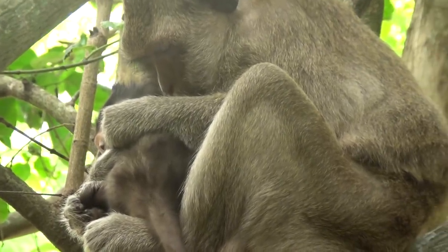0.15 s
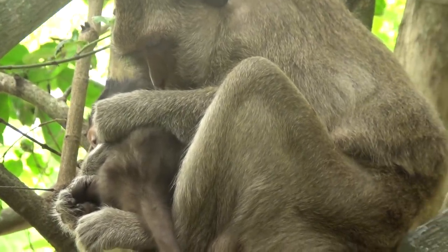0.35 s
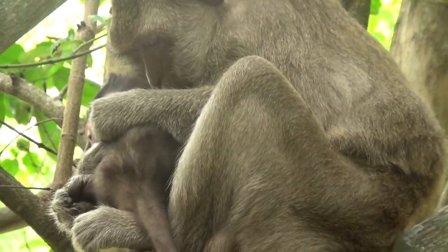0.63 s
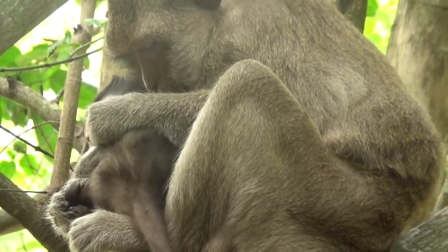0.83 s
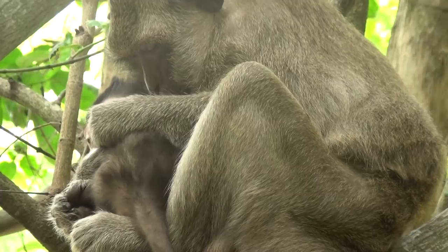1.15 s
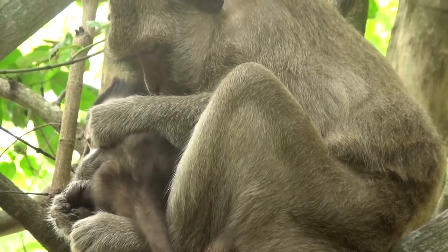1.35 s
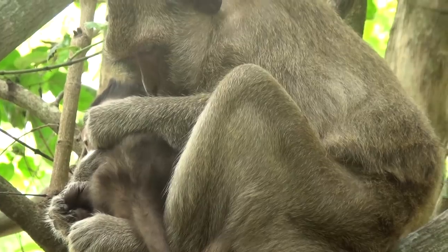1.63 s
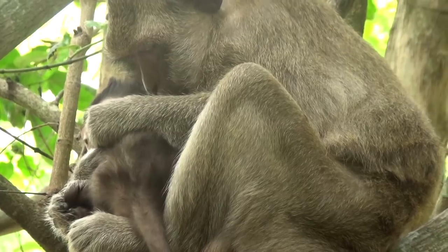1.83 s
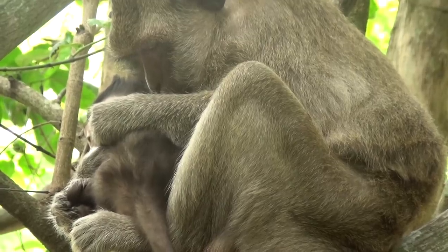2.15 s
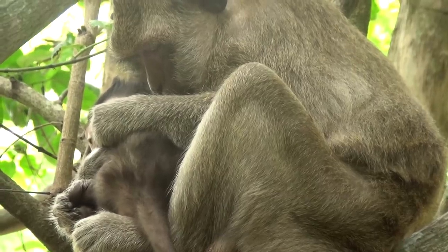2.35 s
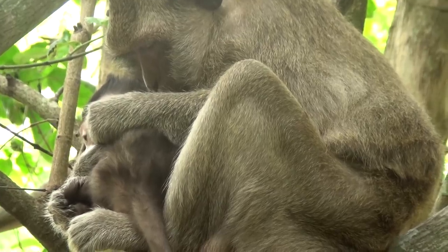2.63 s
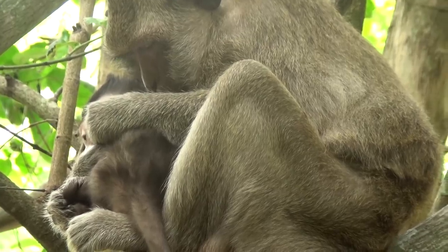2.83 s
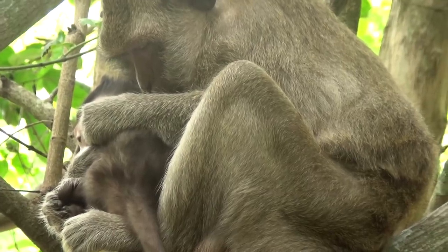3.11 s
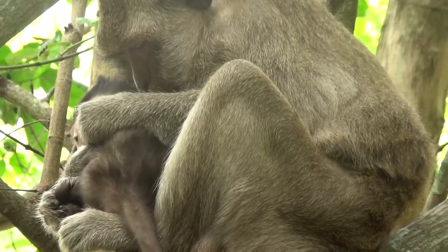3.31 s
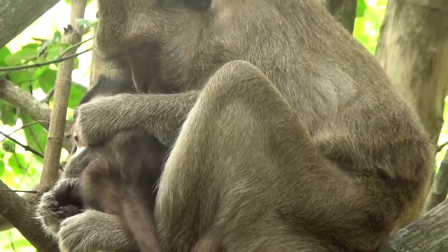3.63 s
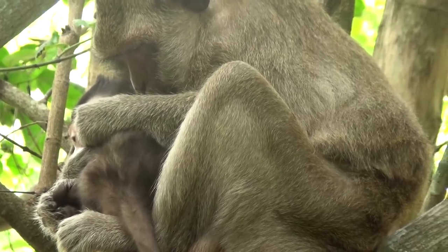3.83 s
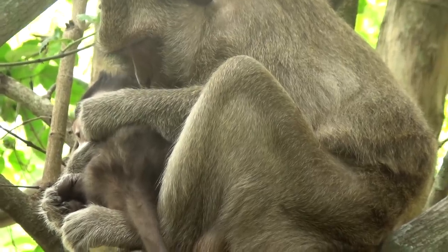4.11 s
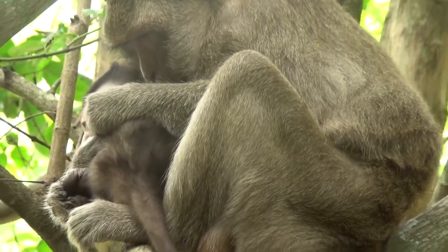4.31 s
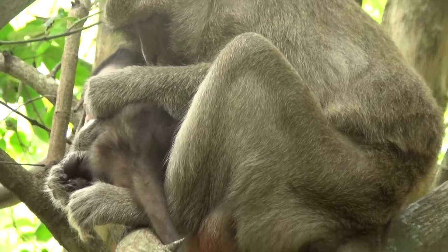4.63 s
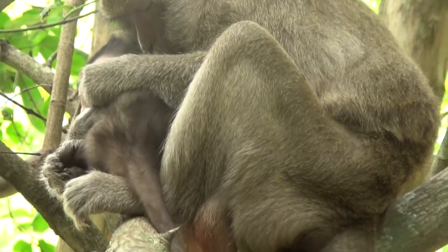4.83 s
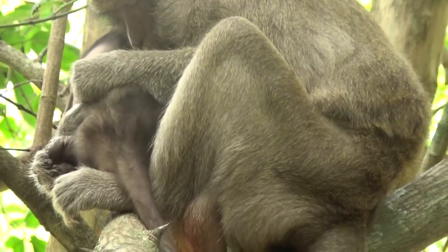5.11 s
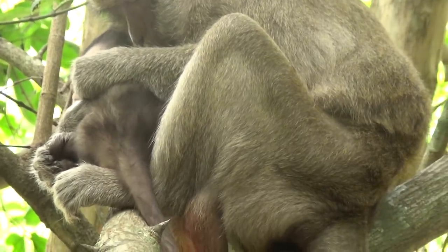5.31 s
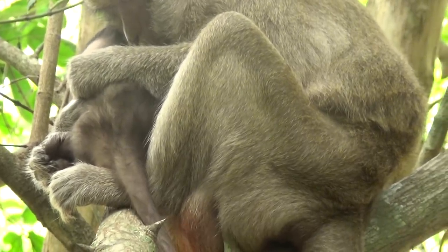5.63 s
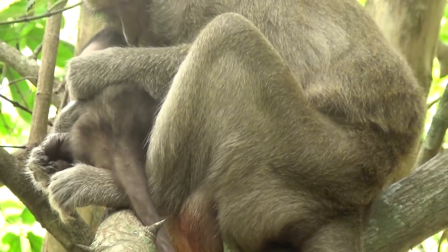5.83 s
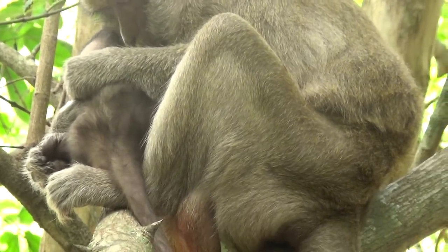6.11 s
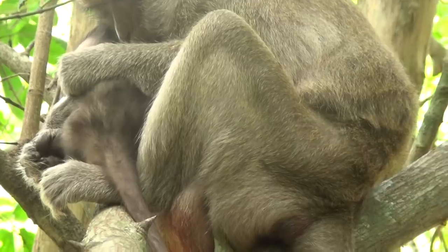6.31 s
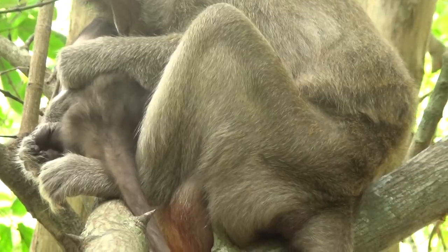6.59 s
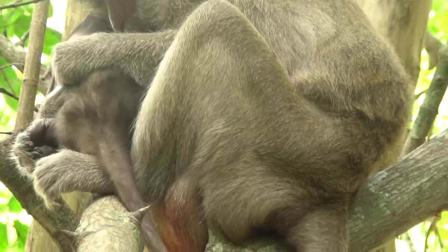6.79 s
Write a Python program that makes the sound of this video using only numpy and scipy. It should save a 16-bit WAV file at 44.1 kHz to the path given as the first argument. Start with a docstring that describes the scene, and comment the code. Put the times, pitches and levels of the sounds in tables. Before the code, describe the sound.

After a faint far whistle and a soft falling grunt with a scuff on bark, a monkey gives five clear, whistled coos that arch in pitch. Four short, very high squeals follow, each collapsing into a falling rasp. The calls come from nearly straight ahead, outdoors in a tree, with a brief echo from trunks and leaves. Foliage hisses softly over a distant low rumble.

```python
"""In a leafy tree, a monkey gives five arched, whistled coos, then four very high squeals.
Each squeal starts as a nearly pure whistle, splits into subharmonics under strain and collapses
into a falling rasp. A faint far call and a soft falling grunt with a scuff on bark come first.
Foliage hisses over a distant rumble, and trunks and leaves echo the calls."""
import sys
import numpy as np
from scipy import signal
from scipy.fft import rfft, irfft, next_fast_len
from scipy.io import wavfile
from scipy.ndimage import map_coordinates

SR = 44100
rng = np.random.default_rng(int(sys.argv[2]) if len(sys.argv) > 2 else 0)


def unload_audio(sound):
    """Save the sound as a 16-bit wav file, at the path given as the first command line argument."""
    columns = np.transpose(np.atleast_2d(sound))
    # keep every value between -1 and 1, then stretch to whole-number steps
    steps = np.round(np.clip(columns, -1, 1) * 32767)
    wavfile.write(sys.argv[1], SR, steps.astype(np.int16))


N = 306529
T = np.arange(N) / SR


def amp(db):
    """Decibels to gain."""
    return 10 ** (np.asarray(db) / 20)


def along(points, hz):
    """(f/Hz, value) points read on a log frequency axis."""
    f, v = np.transpose(points)
    return np.interp(np.log(hz + 1), np.log(f + 1), v)


def curves(rows, t):
    """One envelope for each column after the first, read at the times t."""
    times, *columns = np.transpose(rows)
    return [np.interp(t, times, column) for column in columns]


def ramp(t, start, end):
    """From 0 at start to 1 at end."""
    return np.clip((t - start) / (end - start), 0, 1)


def bumps(rows, t):
    """Sum of bell curves: t/s, width/s, height."""
    return sum(height * np.exp(-((t - s) / width) ** 2) for s, width, height in rows)


def stretch(start, end, edge):
    """Sample indices, times and gate of one sound, with fades edge seconds long."""
    i = np.arange(int((start - edge) * SR), int((end + edge) * SR))
    t = T[i]
    fade = np.clip(np.minimum(t - start, end - t) / edge + .5, 0, 1)
    return i, t, np.sin(np.pi / 2 * fade) ** 2


def wobble(rate, t):
    """A smooth random modulator, rate knots a second."""
    return map_coordinates(rng.standard_normal(len(t) // 2), [(t - t[0]) * rate], mode="wrap")


def cycle(hz):
    """Running phase of a pitch curve."""
    return 2 * np.pi * np.cumsum(hz) / SR


def filtered(x, response):
    """Zero-phase EQ; response gives the gain at each frequency."""
    size = next_fast_len(x.shape[-1] + 8192)
    return irfft(rfft(x, size) * response(np.fft.rfftfreq(size, 1 / SR)), size)[..., :x.shape[-1]]


def noise(colour, t):
    """Coloured noise of rms 1."""
    x = filtered(rng.standard_normal(len(t)), lambda hz: amp(along(colour, hz)))
    return x / np.sqrt(np.mean(x ** 2) + 1e-20)


def stereo_noise(colour):
    """A noise bed, mostly alike in both ears."""
    # left-right likeness: f/Hz, correlation
    likeness = [(40, 1), (150, 0.95), (600, 0.84), (2200, 0.93), (8000, 0.81), (13000, 1)]
    angle = lambda hz: np.arccos(np.clip(along(likeness, hz), -1, 1)) / 2
    mid = filtered(noise(colour, T), lambda hz: np.cos(angle(hz)))
    side = filtered(noise(colour, T), lambda hz: np.sin(angle(hz)))
    return np.array([mid + side, mid - side])


def foliage(rustle_db=0.54, brush_at_s=1.42, brush_width_s=0.017, brush_db=-55):
    """Leaf hiss that comes and goes, with one quick brush against the leaves."""
    # swells of the hiss: t/s, level/dB
    hiss_envelope = [(0, -72.5), (1.7, -72), (2.4, -72), (3.05, -66), (3.2, -70), (3.5, -63), (4.22, -58),
                     (4.35, -63.5), (4.78, -69), (4.93, -58.5), (5.03, -57.5), (5.15, -65), (5.55, -63.5),
                     (6, -67.5), (6.6, -66), (6.95, -71)]
    # colour of the leaves: f/Hz, level/dB
    leaf_colour = [(1180, -18), (2000, -5), (2600, -5), (2960, -5.5), (3230, -3.5), (3680, -3.5),
                   (8120, 0.5), (12500, -3), (16000, -10)]
    swells = amp(curves(hiss_envelope, T)[0] + rustle_db * wobble(30, T))
    brush = bumps([(brush_at_s, brush_width_s, amp(brush_db))], T)
    return (swells + brush) * stereo_noise(leaf_colour)


def distant_rumble(level_db=-57.0, sway_db=0.66):
    """A low, gently wavering bed from far away."""
    # colour of the rumble: f/Hz, level/dB
    rumble_colour = [(10, -31), (22, -13.5), (40, 1.5), (65, -4.5), (100, 0.5), (180, -10), (210, -7.5),
                     (390, -14), (560, -11.5), (690, -17.5), (1100, -16.5), (1550, -18.5), (2000, -26.5),
                     (4000, -31.5), (8000, -43.5)]
    return amp(level_db + sway_db * wobble(8, T)) * stereo_noise(rumble_colour)


def far_call(quaver=.01):
    """A thin falling whistle deep in the trees."""
    # the whistle's glide: t/s, f/Hz, level/dB
    contour = [(.06, 2960, -70), (.12, 2940, -79), (.16, 2660, -68), (.22, 2500, -72)]
    out = np.zeros(N)
    i, t, gate = stretch(contour[0][0], contour[-1][0], edge=0.025)
    pitch, db = curves(contour, t)
    phase = cycle(pitch * (1 + quaver * wobble(98, t)))
    out[i] = gate * amp(db) * np.sqrt(2) * np.sin(phase)
    return out


def grunt(jitter=0.033, octave_db=-11):
    """A short low grunt that drops two octaves."""
    # the voice's drop: t/s, f/Hz, relative level/dB
    contour = [(0.247, 565, -64), (.265, 418, -52.5), (.29, 269.5, -47.5), (.302, 154, -38.5),
               (.315, 133, -43), (.345, 125, -57)]
    out = np.zeros(N)
    i, t, gate = stretch(contour[0][0], contour[-1][0], edge=.01)
    pitch, db = curves(contour, t)
    phase = cycle(pitch * (1 + jitter * wobble(185, t)))
    out[i] = gate * amp(db) * np.sqrt(2) * (np.sin(phase) + amp(octave_db) * np.sin(2 * phase))
    return out


def scuff():
    """A dull scrape on the branch, under the grunt."""
    # rise and fall of the scrape: t/s, level/dB
    scuff_envelope = [(.2, -64), (.26, -61.5), (.3, -52.5), (.35, -54.5), (.43, -57.5), (0.561, -65)]
    # colour of the bark: f/Hz, level/dB
    bark_colour = [(120, -26), (230, 0.5), (420, -0.5), (600, -9.5), (1000, -10.5), (2100, -16),
                   (2800, -10.5), (4700, -18), (5800, -29), (10000, -34), (12500, -26), (16000, -39)]
    out = np.zeros(N)
    i, t, gate = stretch(scuff_envelope[0][0], scuff_envelope[-1][0], edge=0.032)
    out[i] = gate * amp(curves(scuff_envelope, t)[0]) * noise(bark_colour, t)
    return out


def coos(usual_hz=1538, tremor=0.0041, shimmer_db=2.5, sag_db=4.5, spill_db=-31, air_db=-18,
         edge_growth=2.77, edge_db_per_octave=21):
    """A nearly pure voice that swells and sags: two strong partials, and a bright edge when pushed."""
    # one pitch arch per coo: t/s, f/Hz
    arches = [
        [(0.56, 1230), (0.584, 1356), (0.619, 1445), (0.74, 1747), (0.846, 1871), (0.931, 1890), (0.99, 1831),
         (1.038, 1710), (1.088, 1360)],
        [(1.25, 1106), (1.297, 1348), (1.356, 1450), (1.486, 1575), (1.551, 1525), (1.61, 1431)],
        [(1.81, 1213), (1.878, 1552), (1.895, 1507), (1.916, 1570), (1.975, 1527), (2.064, 1565), (2.102, 1618),
         (2.24, 1434)],
        [(2.5, 1437), (2.527, 1487), (2.553, 1417), (2.565, 1500), (2.58, 1546), (2.686, 1492), (2.698, 1464),
         (2.939, 1496), (3.087, 1371)],
        [(3.44, 1322), (3.531, 1332), (3.567, 1485), (3.579, 1432), (3.611, 1522), (3.635, 1439), (3.717, 1433),
         (3.776, 1491), (3.95, 1390)],
    ]
    # each coo's effort: peak t/s, level/dB, swell to the peak/dB, bright edge/dB
    efforts = [(.985, -44, 7.5, -54), (1.5, -46.5, 1, -64), (2.16, -46.8, 4, -64), (2.95, -49, 9.5, -63.5),
               (3.82, -49.5, 9, -64)]
    # the voice flips briefly upward: t/s, width/s, rise/share of pitch
    flips = [(1.881, .01, 0.092), (1.921, .009, 0.14), (2.115, 0.0066, 0.047), (2.868, .015, .02)]
    # the voice turns hoarse: t/s, width/s, roughness/0-1
    hoarse_spots = [(1.06, 0.023, 0.47), (1.59, 0.026, 0.33), (1.9, 0.062, 0.52), (2.11, 0.028, .4),
                    (2.23, 0.015, 0.35), (2.62, 0.1, 0.48), (2.9, .08, 0.17), (3.06, 0.043, 0.2),
                    (3.56, 0.07, 0.57), (3.92, 0.033, 0.23)]
    # the voice falters: t/s, width/s, dip/dB
    falters = [(1.88, 0.054, -5.5), (2.54, 0.026, -9.5), (2.685, .014, -4), (2.835, 0.011, -7),
               (3.48, 0.031, -7)]
    # peaks and dips that the fundamental slides through: f/Hz, level/dB
    fundamental_colour = [(1130, 1), (1270, 4), (1340, 3.5), (1420, 1), (1465, 2.5), (1500, -2),
                          (1548, 6.5), (1585, 0.5), (1612, 1.5), (1660, -4), (1715, 1), (1790, -11),
                          (1865, -3), (1895, -13)]
    # colour of the octave: f/Hz, level/dB
    octave_colour = [(2400, -11), (2760, -4), (2950, -8), (3010, 0), (3090, -0.5), (3480, 4), (3700, -1.5),
                     (3780, -9)]
    # colour of the upper harmonics and breath: f/Hz, level/dB
    throat_colour = [(3700, 5), (4500, -5), (5600, -14), (6200, -11.5), (7600, -14.5), (9000, -0.5),
                     (10500, -5.5), (11400, 1.5), (12300, 1), (13200, -15), (15000, -22), (17000, -33)]
    out = np.zeros(N)
    for arch, (peak, level_db, swell_db, edge_db) in zip(arches, efforts):
        start, end = arch[0][0], arch[-1][0]
        i, t, gate = stretch(start, end, edge=.008)
        pitch, = curves(arch, t)
        flip, rough = bumps(flips, t), bumps(hoarse_spots, t)
        effort_db = -swell_db * (1 - ramp(t, start, peak)) ** 2 - sag_db * ramp(t, peak, end) ** 2
        # the edge grows faster than the effort, and with pitch
        bright_db = edge_db + edge_growth * effort_db + edge_db_per_octave * np.log2(pitch / usual_hz)
        pitch = pitch * (1 + flip + tremor * wobble(70.2, t))
        db = level_db + effort_db + bumps(falters, t)
        fundamental_db = db + along(fundamental_colour, pitch)
        octave_db = db + along(octave_colour, 2 * pitch) + 32 * flip  # flips push the octave forward
        # hoarseness shakes the pitch, adds breath and makes the level flutter
        pitch = pitch * (1 + 0.023 * rough * wobble(500, t))
        phase = cycle(pitch)
        gains = [amp(fundamental_db), amp(octave_db)]
        gains += [amp(bright_db + along(throat_colour, k * pitch)) for k in range(3, 11)]
        gains[2] += amp(octave_db + spill_db)  # a little octave spills into the third harmonic
        voice = sum(gain * amp(shimmer_db * wobble(59.68, t)) * np.sin(k * phase)
                    for k, gain in enumerate(gains, 1))
        breath = amp(bright_db + air_db + 16 * rough) * noise([(2000, -44)] + throat_colour, t)
        flutter = amp(3.0 * rough * wobble(250.8, t))
        out[i] += gate * flutter * (np.sqrt(2) * voice + breath)
    return out


def squeals(tremor=0.006, jitter=0.0048, shimmer_db=2.5, db_per_octave=20, doubling_s=0.017,
            twin_ratio=0.96, twin_db=-15, twin_swing_db=6, twin_slip_rad=0.29, split_slip_rad=0.35,
            halves_trace_db=-33, thirds_trace_db=-37, air_db=-20.0):
    """A whistle near 9 kHz; under strain it repeats only every second, then every third cycle."""
    # one pitch curve per squeal: t/s, f/Hz
    contours = [
        [(4.319, 8840), (4.335, 8900), (4.341, 9400), (4.385, 10150), (4.429, 9980), (4.447, 9639),
         (4.49, 9700)],
        [(5.068, 8420), (5.088, 9190), (5.104, 9020), (5.11, 8610), (5.122, 8500), (5.194, 9460), (5.21, 8540),
         (5.229, 8630)],
        [(5.612, 8630), (5.636, 9300), (5.662, 8150), (5.682, 8756), (5.706, 8030), (5.732, 9160),
         (5.764, 8040), (5.78, 7900)],
        [(6.132, 8370), (6.15, 8800), (6.154, 9150), (6.164, 9611), (6.198, 9470), (6.21, 9080), (6.304, 9080),
         (6.317, 7930)],
    ]
    # each squeal's strain: relative level/dB, opening accent/dB, period doubled t/s, halves/dB,
    # period tripled t/s, tripling time/s, thirds/dB
    strains = [(-37, -2, 4.458, -8, 4.487, 0.087, -8), (-38, 1, 5.17, -22, 5.215, 0.065, -1.5),
               (-37.5, -2, 5.675, -12.5, 5.762, .03, -4.5), (-38, 4.5, 6.226, -9, 6.31, 0.053, 2)]
    # colour of the subharmonics: f/Hz, level/dB
    split_colour = [(2800, -21), (4500, -4), (5700, -4), (11500, 3.5), (14000, 4), (16500, 8)]
    # throat noise around the whistle: f/Hz, level/dB
    air_colour = [(2000, -41), (3200, -19), (6000, -2), (7800, -3), (9500, -21), (10700, -18), (12000, 14),
                  (13200, -11), (14600, -7), (16500, -7)]
    out = np.zeros(N)
    for contour, strain in zip(contours, strains):
        level_db, accent_db, doubled_at, halves_db, tripled_at, tripling_s, thirds_db = strain
        i, t, gate = stretch(contour[0][0], contour[-1][0], edge=.003)
        pitch, = curves(contour, t)
        push_db = bumps([(t[0] + 0.025, 0.026, accent_db)], t)  # just after the attack
        db = level_db + db_per_octave * np.log2(pitch / pitch.mean()) + push_db
        halves_gain = amp(np.interp(t, [doubled_at - doubling_s, doubled_at],
                                    [halves_trace_db, halves_db]))
        thirds_gain = amp(np.interp(t, [tripled_at - tripling_s, tripled_at],
                                    [thirds_trace_db, thirds_db]))
        pitch = pitch * (1 + tremor * wobble(251, t) + jitter * wobble(1400, t))
        phase = cycle(pitch)

        def partial(ratio):
            """One unsteady tone of the split voice, at ratio times the pitch."""
            gain = amp(along(split_colour, ratio * pitch) + shimmer_db * wobble(198, t))
            return gain * np.sin(ratio * (phase + split_slip_rad * wobble(1200, t)))

        halves = partial(1 / 2) + partial(3 / 2)
        thirds = sum(partial(k / 3) for k in (1, 2, 4, 5))
        # the other vocal fold runs slightly flat and beats against the first
        twin_gain = amp(twin_db + twin_swing_db * np.tanh(wobble(30.6, t)))
        twin = twin_gain * np.sin(twin_ratio * phase + twin_slip_rad * wobble(377, t))
        voice = np.sin(phase) + twin + halves_gain * halves + thirds_gain * thirds
        # turbulence in the throat grows through the squeal
        air = amp(air_db) * np.linspace(.3, 1.5, len(t)) * noise(air_colour, t)
        out[i] += gate * amp(db + shimmer_db * wobble(148.7, t)) * (np.sqrt(2) * voice + air)
    return out


def rasps(jitter=0.0502, ragged_rate=650, octave_db=-8, core_colour_depth=0.37, crossover_hz=5200,
          treble_fade_db=-11, low_db=-2, low_lag_db=-9.0, onset_db=-14, release_db=-4, flutter_db=3.0):
    """The voice turns chaotic: a fluttering noise that darkens around a ragged core sliding down."""
    # the collapse that ends each squeal: start t/s, full t/s, end t/s, relative noise level/dB,
    # relative core level/dB, core's first f/Hz, core's last f/Hz
    collapses = [(4.478, 4.498, 4.544, -27.5, -28, 6890, 3850), (5.194, 5.242, 5.281, -29, -35, 5960, 2690),
                 (5.756, 5.793, 5.817, -32, -35.5, 5460, 3310),
                 (6.304, 6.325, 6.351, -29.5, -31, 5620, 3533)]
    # colour of the rasp: f/Hz, level/dB
    rasp_colour = [(1700, -30), (2400, -13.5), (3300, -4), (4200, -0.5), (5800, 2), (7500, -0.5),
                   (10000, 1), (12000, -5.5), (14200, -1.5), (16500, -10)]

    def ragged(phase, t):
        """A tone smeared into a narrow band of noise."""
        return wobble(ragged_rate, t) * np.sin(phase) + wobble(ragged_rate, t) * np.cos(phase)

    out = np.zeros(N)
    for start, full, end, noise_db, core_db, first_hz, last_hz in collapses:
        i, t, gate = stretch(start, end, edge=.008)
        rise, fall = ramp(t, start, full), ramp(t, full, end)
        slide = np.sin(np.pi / 2 * fall) ** 2
        pitch = first_hz + (last_hz - first_hz) * slide
        phase = cycle(pitch * (1 + jitter * wobble(1500, t)))
        core_gain = amp(core_db + core_colour_depth * along(rasp_colour, pitch)) * rise
        core = core_gain * (ragged(phase, t) + amp(octave_db) * ragged(2 * phase, t))
        chaos = noise(rasp_colour, t)
        low = filtered(chaos, lambda hz: 1 / (1 + (hz / crossover_hz) ** 8))
        treble = chaos - low
        # as the throat relaxes the treble fades and the lower band comes in
        darkening = amp(treble_fade_db * fall) * treble + amp(low_db + low_lag_db * (1 - slide)) * low
        db = onset_db * (1 - rise) + release_db * fall ** 4 + flutter_db * wobble(597, t)
        out[i] += gate * amp(db) * (core + amp(noise_db) * darkening)
    return out


def canopy(x, trunks_db, leaves_db, trunks_t60_s=0.095, echoes_per_s=900, side_db=-10):
    """Near trunks throw back quick echoes; the leaves scatter a soft tail."""
    # decay among the leaves: f/Hz, t60/s
    leaf_decay = [(200, 0.34), (1500, 0.28), (4000, .36), (9000, 0.39), (16000, 0.3)]
    # stereo width of the echoes: f/Hz, relative side level/dB
    echo_width = [(1500, -1), (2500, -9.5), (5000, -2.5), (10000, 0), (12500, -11.5)]
    hz, t, spectra = signal.stft(rng.standard_normal((2, SR // 2)), SR, nperseg=256)
    tail = signal.istft(spectra * amp(-60 * t / along(leaf_decay, hz)[:, None]), SR, nperseg=256)[1]
    lag = np.arange(tail.shape[1]) / SR
    taps = rng.standard_normal(tail.shape) * (rng.random(tail.shape) < echoes_per_s / SR)
    trunks = taps * amp(-60 * lag / trunks_t60_s) * (lag > .003)  # 3 ms pre-delay
    impulse = sum(amp(db) * part / np.linalg.norm(part, axis=1, keepdims=True)
                  for db, part in [(trunks_db, trunks), (leaves_db, tail)])
    mid, side = signal.fftconvolve(x[None], impulse, axes=1)[:, :N]
    side = filtered(side, lambda hz: amp(side_db + along(echo_width, hz)))
    return np.array([mid + side, mid - side])


def scene(grunt_db=-3, squeal_db=-3.5, rasp_db=-2, opening_pan_db=2.5, coo_pan_db=0.16):
    """The calls, nearly straight ahead; the shrill ones stir the strongest echo."""
    pan_left = lambda db: amp([[db], [-db]])
    cooing = coos()
    opening = amp(grunt_db) * grunt() + scuff() + far_call()
    shrill = amp(squeal_db) * squeals() + amp(rasp_db) * rasps()
    direct = opening * pan_left(opening_pan_db) + cooing * pan_left(coo_pan_db) + shrill
    echoes = canopy(opening + cooing, trunks_db=-7, leaves_db=-9.5)
    echoes += canopy(shrill, trunks_db=-4.5, leaves_db=-7)
    return direct + echoes + foliage() + distant_rumble()


def record(dry, top_hz=16500):
    """A brick-wall low-pass trims the very top."""
    return filtered(dry, lambda hz: hz < top_hz)


dry = scene()
out = record(dry)
unload_audio(out)
```